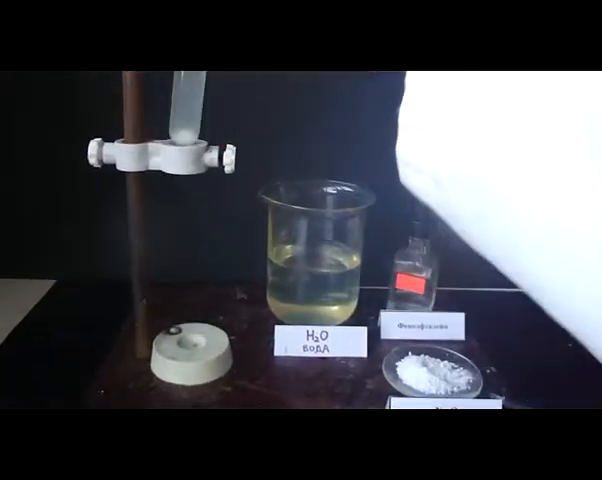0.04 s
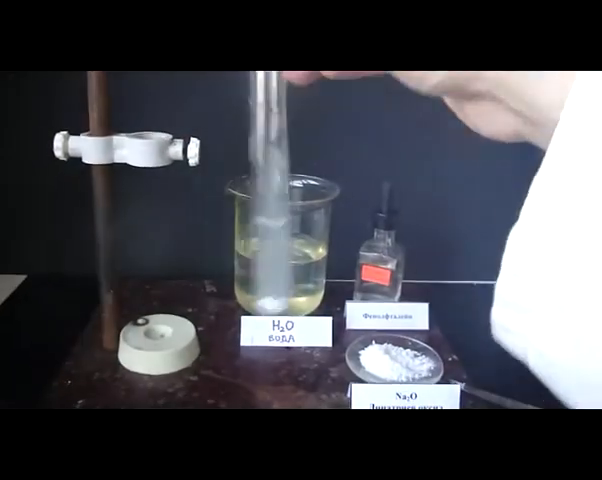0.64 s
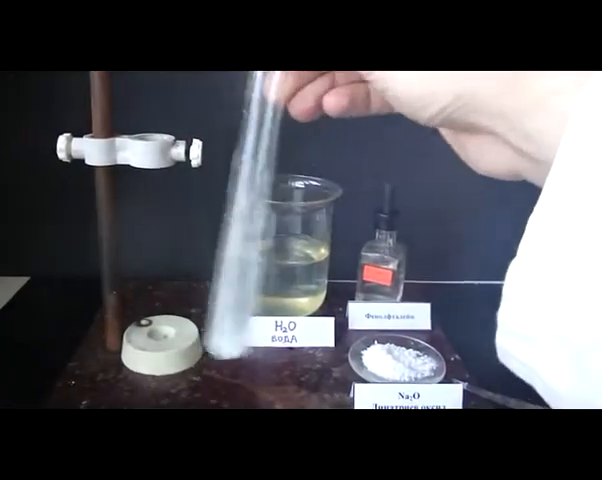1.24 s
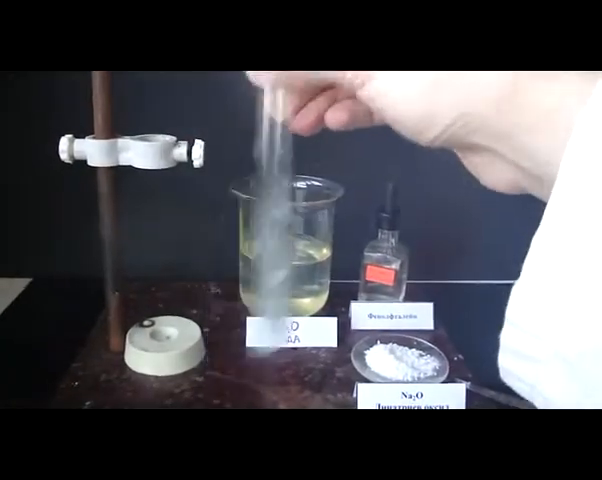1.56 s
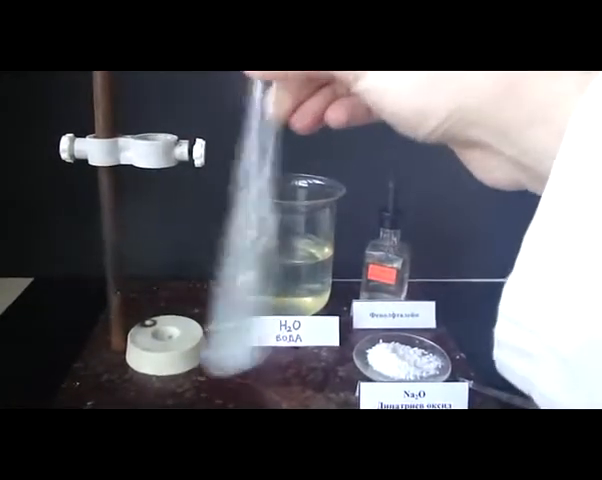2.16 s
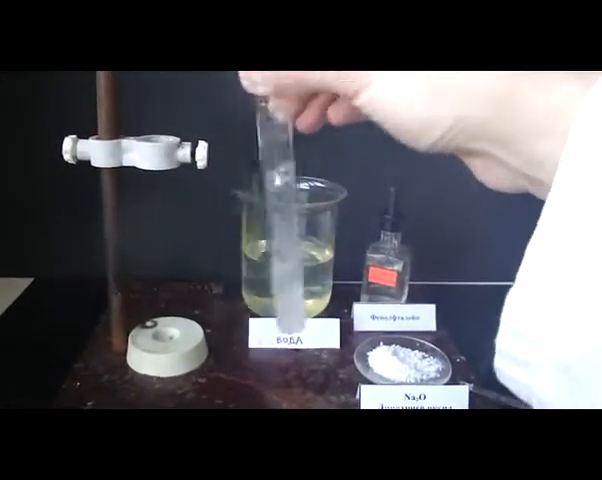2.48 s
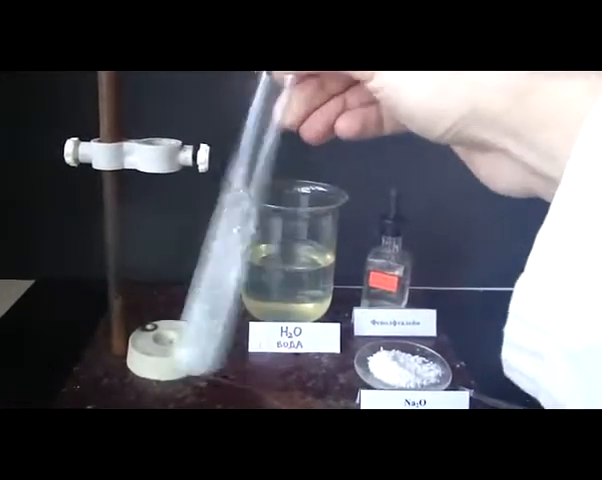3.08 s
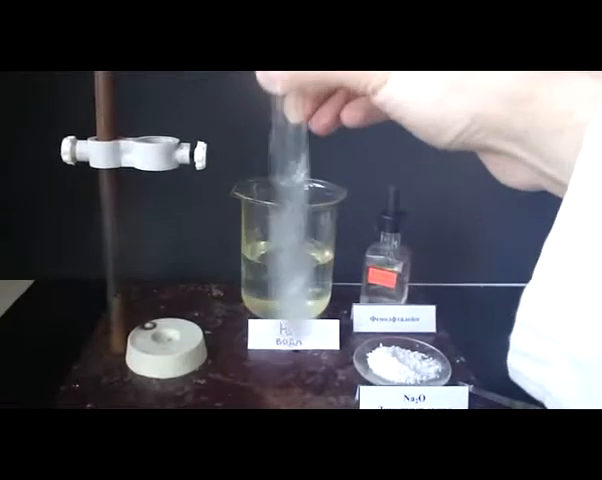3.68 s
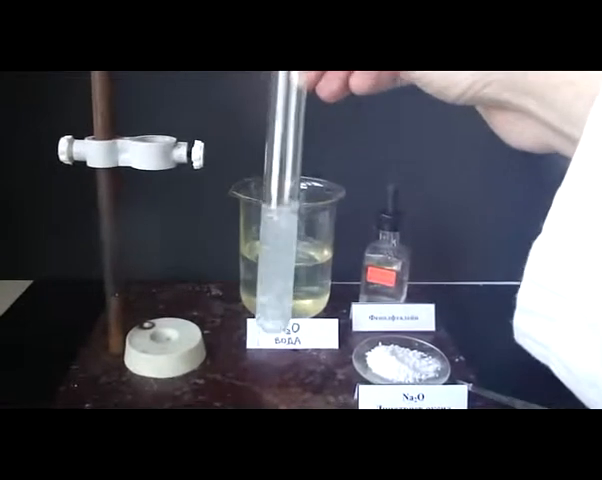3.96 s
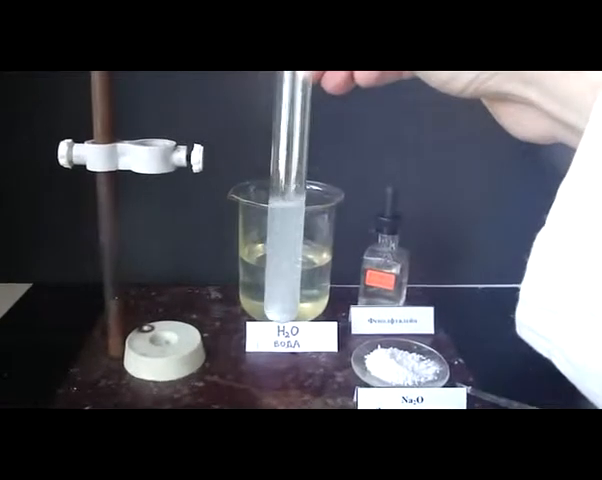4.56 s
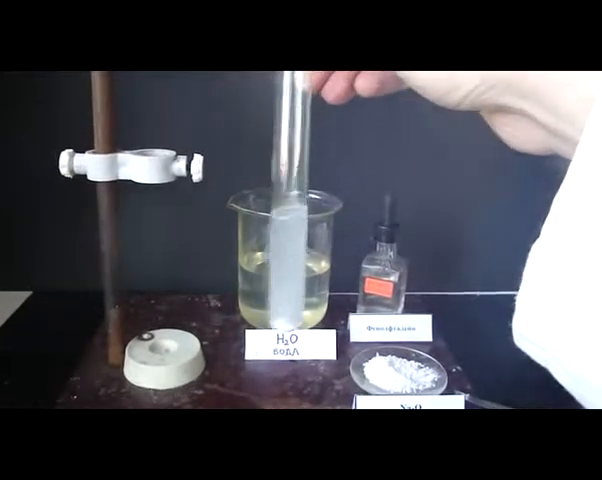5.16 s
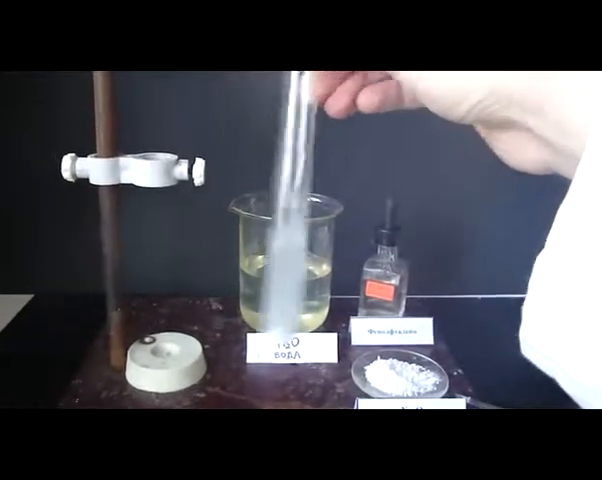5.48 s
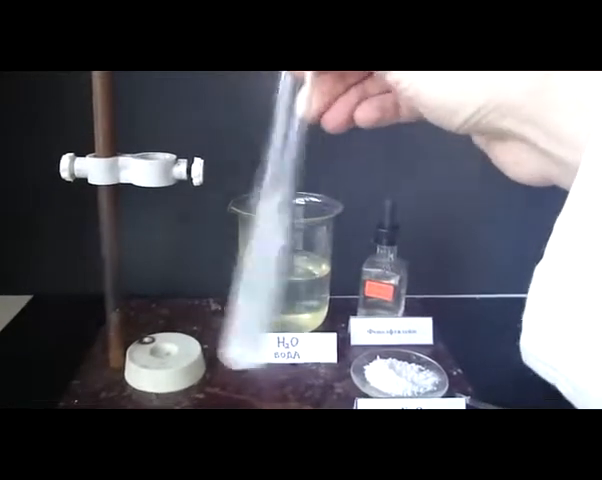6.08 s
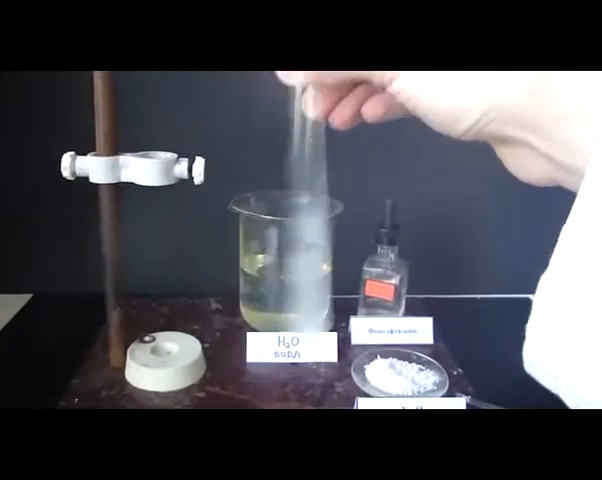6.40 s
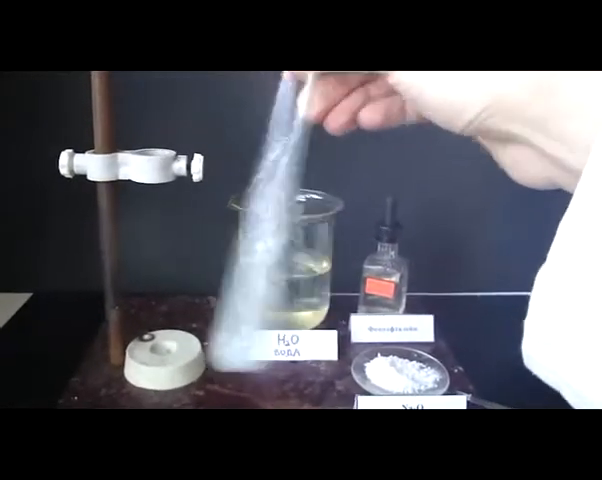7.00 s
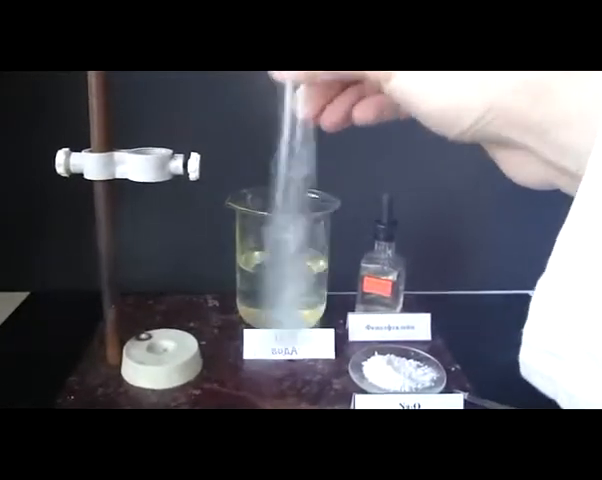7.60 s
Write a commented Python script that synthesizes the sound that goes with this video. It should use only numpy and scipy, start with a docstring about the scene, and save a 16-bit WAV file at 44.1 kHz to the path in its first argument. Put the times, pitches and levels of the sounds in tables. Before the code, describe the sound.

Close to the microphone in a small lab, water in a glass test tube gives a brief bubbly slosh, then is shaken in two bouts with a pause between. Small bubbles plop and chirp upward in pitch, with slightly hollow splashes and a fine frothy crackle. The loudest plops overload the microphone a little. A steady soft hiss lies underneath, and a lens motor ticks faintly now and then.

```python
"""A small lab, close to the microphone: a test tube of cloudy water is shaken by hand in two bouts.
Trapped bubbles ring and rise in pitch, their splashes sound the air column of the tube, and fine
froth crackles between them. A lens motor ticks faintly over the room hiss, and the loudest plops
overload the microphone."""
import sys
import numpy as np
from scipy import signal
from scipy.fft import rfft, irfft
from scipy.io import wavfile

SR = 44100
rng = np.random.default_rng(int(sys.argv[2]) if len(sys.argv) > 2 else 0)


def dump(signal):
    """Clip the signal to [-1, 1] and save it as 16-bit WAV at the path in sys.argv[1]."""
    limited = np.clip(np.atleast_2d(signal).T, -1, 1)
    pcm = np.round(limited * 32767).astype(np.int16)
    wavfile.write(sys.argv[1], SR, pcm)


N = 345744

# bubbles that stand out: t/s, level/dB, f/Hz, initial rise/(octaves per 10 ms), splash level/dB
BUBBLES = [ (.712, -21, 9000, 0.91, -27), (.799, -23, 3470, 0.23, -35), (.834, -18.5, 697, 0.1, -31),
           (.8345, -13, 1027, 0.4, -20.5), (.837, -16, 1515, 0.084, -31), (.868, -25, 2720, 0, -25),
           (.867, -25, 1170, .3, -22), (.926, -24.5, 3170, .1, -33), (1.32, -17, 2260, 0.043, -30.5),
           (1.476, -22, 8950, 0, -24.5), (1.581, -18.5, 2590, 0.23, -22), (1.599, -24, 8700, 0, -26),
           (1.698, -4.5, 4940, 0.26, -20.5), (1.7407, 0.5, 3854, 0, -11), (1.741, -12, 2394, 0.023, -30),
           (1.85, -36, 3380, .1, -17), (1.864, -28, 5100, 0, -20.5), (1.925, -27, 3470, 0, -22),
           (1.996, -14, 5210, 0.071, -21.5), (2.064, -33, 1930, 0.12, -24.5),
           (2.1122, -3, 1795, 0.13, -11.5), (2.117, -6.5, 1965, 0.27, -30), (2.133, -19, 9800, 0.3, -20),
           (2.175, -20.5, 8770, 0.17, -30), (2.234, -13.5, 8460, 0.15, -18), (2.2562, -10, 4020, 0.34, -11),
           (2.292, -11, 2254, 0, -19.5), (2.3446, -15, 4660, 0.058, -20), (2.381, -28, 8400, 0, -20),
           (2.4, -16.5, 3860, 0, -17.5), (2.413, -5.5, 4070, 0.099, -19), (2.5035, -18, 4620, 0.0055, -27),
           (2.5463, -10, 3770, 0.15, -10.5), (2.548, -21, 790, 0, -28.5), (2.5505, -14.5, 1196, 0.19, -14),
           (2.646, -7.5, 3240, .03, -11), (2.646, -13.5, 2055, 0.073, -36), (2.6855, -15, 2350, 0.01, -16),
           (2.754, -17.5, 4660, 0.29, -21.5), (2.767, -24, 1380, 0.11, -28), (2.801, -15, 4030, 0.23, -9.5),
           (2.8795, 0, 1430, 0.42, -8.5), (2.9055, -9.5, 2580, .25, -24), (2.9353, -6.5, 5630, 0.28, -4),
           (2.9382, -1.5, 1224, 0.13, -6), (2.94, -4, 788, 0.016, -11), (3.0025, 3.5, 809, 0.32, -7.5),
           (3.003, -7, 598, 0.21, -19.5), (3.003, -8, 2187, 0.071, -15), (3.012, -13, 1000, 0.27, -21),
           (3.067, -24.5, 800, 0.089, -19), (3.077, -13.5, 2610, 0.25, -25), (3.0825, -8.5, 1157, 0, -14),
           (3.1264, -8, 4880, 0.019, -11.5), (3.153, -7, 1880, 0.054, -15), (3.1945, -25, 619, 0.3, -41),
           (3.2155, -19, 1450, 0, -20), (3.277, -23, 1800, 0.072, -26), (3.293, -19, 2780, 0.22, -25),
           (3.296, -17.5, 8700, 0, -38), (3.316, -5.5, 6500, 0.098, -8.5), (3.3165, -9.5, 7820, 0.11, -25),
           (3.348, -20, 2520, 0.18, -32), (3.435, -20, 1960, 0, -33), (3.469, -11.5, 3670, 0.32, -14.5),
           (3.542, -21, 323, 0.63, -35), (3.6005, -9.5, 6510, 0.099, -20), (3.62, -8, 3830, 0.25, -18),
           (3.635, -25, 700, 0, -33.5), (3.6486, -14, 1245, 0.052, -18), (3.655, -22, 6700, 0, -25),
           (3.712, -22, 8300, .08, -32), (3.736, -15.5, 2410, 0.058, -19), (3.796, 2, 1883, 0.041, -13),
           (3.991, -33, 2430, 0.061, -48), (4.082, -34, 2450, 0.0062, -40), (5.681, -25.5, 2390, 0, -28),
           (5.906, -16.5, 4470, 0.17, -24), (5.927, -23, 6500, 0.044, -22.5), (6.042, -14, 3540, 0, -23.5),
           (6.171, -26, 1130, 0.36, -33), (6.1787, -19, 2530, 0.27, -18), (6.29, -30, 2010, 0.18, -20.5),
           (6.3325, -16, 8600, 0.065, -21), (6.3433, -19, 2430, .11, -11.5), (6.348, -5, 776, 0.016, -34),
           (6.398, -8.5, 3840, 0.045, -14.5), (6.406, -7, 5250, 0.012, -12.5), (6.4628, -2, 691, 0.15, -13),
           (6.467, -1, 2505, 0.011, -15.5), (6.518, -17, 9100, 0, -22), (6.5353, -10, 2560, 0.03, -20),
           (6.5365, -12, 682, 0.53, -17.5), (6.6, -24, 2500, .03, -33), (6.618, -20, 2470, 0.22, -21.5),
           (6.634, -24, 4600, .12, -25), (6.7135, -17.5, 5160, 0, -25.5), (6.782, -30, 5140, 0.043, -23.5),
           (6.862, -22, 8000, 0.28, -19), (6.9285, -8.5, 6340, 0.016, -17), (6.963, -24, 2770, 0.056, -18),
           (6.986, -15, 6700, 0, -16.5), (7.0641, 0.5, 559.4, 0.32, -12), (7.0643, -4.5, 811, 0.21, -11.5),
           (7.075, -12.5, 1080, 0.3, -21), (7.076, -3, 752, 0, -25), (7.081, -8.5, 3780, 0, -11),
           (7.1134, -13.5, 1904, 0.35, -12.5), (7.1271, -4.5, 3670, 0.13, -9.5),
           (7.1285, -6.5, 5010, 0.2, -35), (7.26, 0.5, 2315, 0.065, 2.5), (7.264, -11, 786, 0.24, -15.5),
           (7.321, 8.5, 2374, 0.014, -1.5), (7.3565, -26, 2440, 0.6, -38), (7.4806, -21.5, 4190, 0.21, -22),
           (7.501, -19, 8170, 0.51, -22), (7.6035, -21, 2100, 0, -28.5), (7.648, -27, 4600, .14, -18),
           (7.724, -16, 706, 0.4, -16), (7.736, -14.5, 2600, 0.01, -22), (7.7454, -12, 5140, 0.077, -17),
           (7.775, -14.5, 3390, 0, -21), (7.7855, -22, 3840, 0.14, -11.5)]
# air column closed by the water, near odd multiples of its lowest note: f/Hz, level/dB, t60/s
TUBE_MODES = [(791, -9, 0.089), (2390, -10, 0.034), (3770, -7, 0.016), (5210, -11.5, 0.025),
              (6575, -9.5, 0.015), (8456, -11.5, 0.025), (9790, -19.5, 0.039)]
# spells of shaking, a brief jolt and then the two bouts: start/s, end/s, first level/dB, last level/dB
SHAKING = [(0.658, 0.893, -48, -43), (1.553, 3.801, -49, -41), (5.892, 7.847, -47, -46)]


def from_db(db):
    """Decibels to gain."""
    return 10 ** (np.asarray(db) / 20)


def add(out, s, sound):
    """Mix a sound in at s seconds."""
    at = max(round(s * SR), 0)
    out[at:at + len(sound)] += sound[:max(len(out) - at, 0)]


def butter(x, hz, kind, order=2):
    """Causal low- or high-pass."""
    return signal.sosfilt(signal.butter(order, min(hz, .45 * SR), kind, fs=SR, output="sos"), x)


def coloured(x, spectrum):
    """Filter by a curve (f/Hz, gain/dB) and scale to unit rms."""
    hz, db = np.transpose(spectrum)
    bins = np.maximum(np.fft.rfftfreq(len(x), 1 / SR), 1)
    gain = from_db(np.interp(np.log(bins), np.log(hz), db))
    shaped = irfft(rfft(x) * gain, len(x))
    return shaped / np.sqrt(np.mean(shaped ** 2) + 1e-20)


def ring(drive, modes):
    """Resonators (f/Hz, level/dB, t60/s): a unit click sets each ringing at its level."""
    out = 0
    for hz, db, t60 in modes:
        r, w = np.exp(-np.log(1000) / (t60 * SR)), 2 * np.pi * hz / SR
        mode = signal.lfilter([1, -r * np.cos(w)], [1, -2 * r * np.cos(w), r * r], drive + 1e-18)
        out = out + from_db(db) * mode
    return out


def room_hiss():
    """The steady hiss of the lab, fullest in the low mids."""
    # noise spectrum: f/Hz, relative level/dB
    hiss_colour = [(25, -11), (60, -15), (120, -6.5), (250, -0.5), (500, -0.5), (800, -2.5), (1300, -5.5),
                   (2400, -10), (3500, -11.5), (5300, -12), (8000, -17), (10700, -17.5), (12000, -74),
                   (16000, -11.5)]
    return coloured(rng.standard_normal(N), hiss_colour)


def lens_motor(step_hz=59.94, first_s=.0061, fade_db_per_s=28, uneven_db=1, rattle=.11, rattle_s=.00058):
    """Evenly timed steps tick in short runs that soften as they go; each step rattles for an instant."""
    # runs of the motor: start/s, end/s, starting level/dB
    motor_runs = [(0, .13, -33.5), (0.222, .4, -31.5), (.65, .712, -26.5), (1.185, 1.38, -28.5),
                  (4.02, 4.035, -23), (4.305, 4.35, -26.5), (4.84, 5.0, -39.5), (5.56, 5.65, -37.5),
                  (6.205, 6.22, -25)]
    # resonances of the motor: f/Hz, level/dB, t60/s
    motor_modes = [(5200, 7, 0.0062), (6930, -9.5, 0.013), (8600, -12, 0.0071)]
    t, steps = np.arange(SR // 200) / SR, np.zeros(N)
    for s in np.arange(first_s, N / SR, 1 / step_hz):
        knock = rattle * rng.standard_normal(len(t)) * np.exp(-t / rattle_s)
        knock[0] += 1
        strength = sum(from_db(db - fade_db_per_s * (s - start))
                       for start, end, db in motor_runs if start <= s <= end)
        add(steps, s, strength * from_db(-uneven_db * rng.standard_normal()) * knock)
    return ring(steps, motor_modes)


def agitation(lag_s=.05):
    """How hard the water is churned, as a gain: it grows through each spell and lags behind the hand."""
    t, drive = np.arange(N) / SR, np.zeros(N)
    for start, end, first_db, last_db in SHAKING:
        drive += from_db(np.interp(t, [start, end], [first_db, last_db])) * (t >= start) * (t < end)
    keep = np.exp(-1 / (lag_s * SR))
    return signal.lfilter([1 - keep], [1, -keep], drive + 1e-18)


def froth_level(rest_db=-56, stirred_db=-22, settle_s=0.025, full_db=-16):
    """Shaking keeps the froth alive, each splash stirs up more, and at rest it barely fizzes."""
    stirs = np.zeros(N)
    for s, *_, splash_db in BUBBLES:
        add(stirs, s, [from_db(min(splash_db, full_db) + stirred_db)])
    stirred = signal.lfilter([1], [1, -np.exp(-1 / (settle_s * SR))], stirs + 1e-18)
    return np.sqrt(from_db(rest_db) ** 2 + agitation() ** 2 + stirred ** 2)


def froth(per_s=900, spread_db=4, cycles=32, level_db=-1, tube_db=-26, pitches=24):
    """Tiny bubbles burst at random inside the tube, each on one of many high pitches."""
    # tone of the crackle: f/Hz, gain/dB
    froth_colour = [(500, -23), (1500, -2.5), (2500, -4.5), (4000, 2.5), (5300, 1), (6500, -2.5), (7400, 2),
                    (8600, 8.5), (11000, -7), (15000, 8)]
    sizes = from_db(spread_db * np.minimum(rng.exponential(1, N), 4)) * rng.choice([-1, 1], N)
    pops = sizes * (rng.random(N) < per_s / SR)
    pitch_index = rng.integers(0, pitches, N)
    crackle = sum(ring(pops * (pitch_index == k), [(hz, 0, cycles / hz)])
                  for k, hz in enumerate(np.geomspace(1800, 12000, pitches)))
    in_tube = crackle + from_db(tube_db) * ring(crackle, TUBE_MODES)
    return from_db(level_db) * froth_level() * coloured(in_tube, froth_colour)


def bubble(t, hz, ring_ms, rise, swell_ms=0.34, glide_ms=18, wobble=0.037):
    """A bubble pinches off and rings; its pitch climbs as it nears the surface and wavers if jostled."""
    ms, knots_ms = t * 1000, np.arange(0, 60, 2)
    waver = np.interp(ms, knots_ms, rng.standard_normal(len(knots_ms)))
    jostle = 1 + wobble * waver * min(rise / .1, 1)
    pitch = hz * jostle * 2 ** (rise * glide_ms * np.tanh(ms / glide_ms) / 10)
    envelope = (1 - np.exp(-ms / swell_ms)) * np.exp(-ms / ring_ms)
    return np.sin(2 * np.pi * np.cumsum(pitch) / SR) * envelope


def gurgle(per_s=110, level_db=5, spread_db=5, lowest_hz=700, octaves=2.74, cycles=6, rise=0.091):
    """Faint bubbles tumble in the churned water, louder the harder it is shaken."""
    t, out = np.arange(SR // 20) / SR, np.zeros(N)
    for when, size, climb, strength in rng.random((int(per_s * N / SR), 4)):
        hz = lowest_hz * 2 ** (octaves * size)
        db = level_db + spread_db * (2 * strength - 1)
        add(out, when * N / SR, from_db(db) * bubble(t, hz, cycles * 1000 / hz, rise * climb))
    return out * agitation()


def small_bubbles(per_s=14, level_db=10, splash_db=8, spread_db=4, lowest_hz=2000, octaves=3, rise=.092):
    """Lesser bubbles break at random while the tube is shaken; rows like those of BUBBLES."""
    churn, rows = agitation(), []
    for start, end, *_ in SHAKING:
        for when, size, climb, strength in rng.random((int(per_s * (end - start)), 4)):
            s = start + when * (end - start)
            db = 20 * np.log10(churn[min(int(s * SR), N - 1)]) + spread_db * (2 * strength - 1)
            hz = lowest_hz * 2 ** (octaves * size)
            rows.append((s, db + level_db, hz, rise * climb, db + splash_db))
    return rows


def ring_time_ms(hz, splash_share_db, burst_damping=1.1):
    """Large, low bubbles ring longest; those that burst with a splash are cut short."""
    free_ms = 10 * (1000 / hz) ** 0.55
    return free_ms / (1 + burst_damping * from_db(min(splash_share_db, 0)))


def fragments(t, hz, ring_ms, spread=1.9, lowest_octave=-0.14, rise=0.045, life=0.6, count=6):
    """A breaking air pocket sheds a few short-lived bubbles, mostly smaller, the later ones weaker."""
    out = np.zeros(len(t))
    for late, octave, climb in rng.random((count, 3)):
        tone = bubble(t, hz * 2 ** (lowest_octave + octave), life * ring_ms, rise * climb)
        add(out, late * spread * ring_ms / 1000, np.exp(-late) * tone)
    return out


def splash(t, hz, snap=0.7, spray=1.24, spray_s=0.0016):
    """The film snaps and throws a spray that swells and dies; the smaller the bubble, the brighter."""
    burst = rng.standard_normal(len(t)) * np.sqrt(t) * np.exp(-t / spray_s)
    burst *= spray / np.linalg.norm(burst)
    burst[0] += snap
    return butter(butter(burst, hz / 2, "high"), 3000 + 1.24 * hz, "low", order=1)


def air_column(drive, uneven_db=3.5):
    """The air in the tube rings; moving water shifts its overtones and how strongly each is struck."""
    length = 1 + .025 * rng.standard_normal()
    overtones = [(hz / length, db + uneven_db * rng.standard_normal(), t60)
                 for hz, db, t60 in TUBE_MODES[1:]]
    return ring(drive, TUBE_MODES[:1] + overtones)


def sloshing(spray_coupling_db=-2, tone_coupling_db=-47, fragment_db=-5, push_db=-9):
    """Bubbles and their splashes reach the microphone directly and also drive the air column."""
    t, out = np.arange(SR // 6) / SR, np.zeros(N)
    lowest_hz = TUBE_MODES[0][0]
    lowest_note = butter(ring(t == 0, TUBE_MODES[:1]), 540, "high")
    for s, db, hz, rise, splash_db in BUBBLES + small_bubbles():
        ring_ms = ring_time_ms(hz, splash_db - db)
        tone = from_db(db) * bubble(t, hz, ring_ms, rise)
        tone += from_db(splash_db + fragment_db) * fragments(t, hz, ring_ms)
        spray = from_db(splash_db) * splash(t, hz)
        column = air_column(from_db(spray_coupling_db) * spray + from_db(tone_coupling_db) * tone)
        # each burst also pushes the whole column; large bubbles push hardest
        hum = from_db(splash_db + push_db) * min(lowest_hz / hz, 1) * lowest_note
        add(out, s, tone + spray + column + hum)
    return out


def slaps(crack_s=0.0019, crack_hz=7000, thud_s=0.00043):
    """The water plug hits the glass: a bright crack and a dull push."""
    # impacts of the water: t/s, crack level/dB, thud level/dB
    water_hits = [(1.74, -1.5, -34), (2.9387, -2, -4.5), (3.3135, -29, -36), (3.795, -36, -28),
                  (7.126, -13, -43), (7.2588, -7, -11.5), (7.3210, -15, -9)]
    t, out = np.arange(SR // 50) / SR, np.zeros(N)
    for s, crack_db, thud_db in water_hits:
        crack = butter(rng.standard_normal(len(t)) * np.exp(-t / crack_s), crack_hz, "high")
        add(out, s, from_db(crack_db) * crack + from_db(thud_db) * np.exp(-t / thud_s))
    return out


def lab_echoes(x, early_db=-19, early_t60_s=0.073, late_db=-16, late_t60_s=0.45, gap_s=0.0063):
    """Quick reflections off the bench and glassware, then the short tail of the room."""
    # tone of the reflections: f/Hz, gain/dB
    room_colour = [(100, -52), (500, 1), (900, 8), (2200, 4.5), (4000, 3), (6500, 8.5), (11000, 1.5)]
    t, response = np.arange(SR // 2) / SR, 0
    for db, t60 in ((early_db, early_t60_s), (late_db, late_t60_s)):
        decay = np.exp(-np.log(1000) * t / t60) * (t > gap_s)
        echoes = coloured(rng.standard_normal(len(t)), room_colour) * decay
        response = response + from_db(db) * echoes / np.linalg.norm(echoes)
    return signal.fftconvolve(x, response)[:N]


def scene(room_db=-2, motor_db=-2, hiss_db=-42):
    """One microphone: the tube close up, the lab around it, the motor and the hiss underneath."""
    tube = butter(sloshing(), 525, "high", order=4)   # the narrow mouth radiates little bass
    tube += slaps() + gurgle() + froth()
    hiss = from_db(hiss_db) * room_hiss()
    return (tube + from_db(room_db) * lab_echoes(tube) + from_db(motor_db) * lens_motor() + hiss)[None]


def overload(x, top):
    """Peaks flatten smoothly as they near the ceiling."""
    return x / (1 + (x / top) ** 8) ** (1 / 8)


def record(dry, treble_edge_hz=11000, leak_db=-10, cutoff_hz=16300):
    """Loud plops overload the microphone; little of the highest treble gets through."""
    clipped = butter(overload(dry, top=.58), 24, "high", order=1)
    dull = signal.sosfilt(signal.cheby1(10, .3, treble_edge_hz, fs=SR, output="sos"), clipped)
    leak = signal.sosfilt(signal.butter(2, [12500, 14500], "band", fs=SR, output="sos"), clipped)
    sound = overload(dull + from_db(leak_db) * leak, top=.85)
    return signal.sosfilt(signal.ellip(10, .2, 80, cutoff_hz, fs=SR, output="sos"), sound)


dry = scene()
out = record(dry)
dump(out)
```